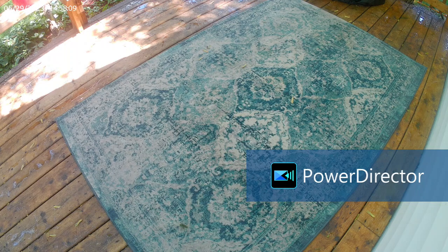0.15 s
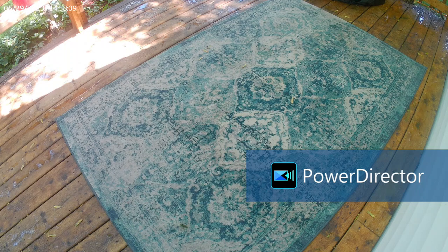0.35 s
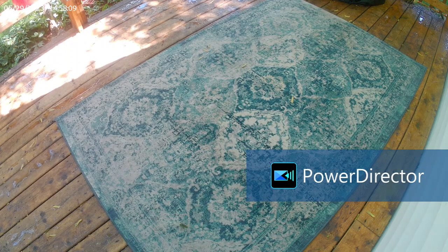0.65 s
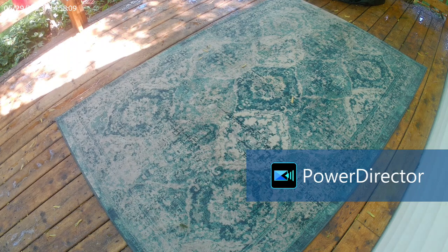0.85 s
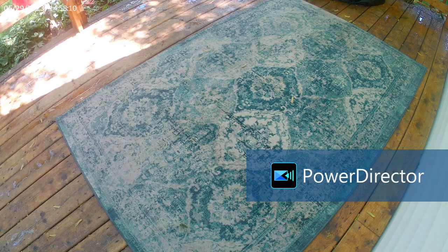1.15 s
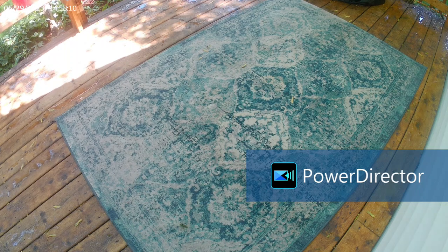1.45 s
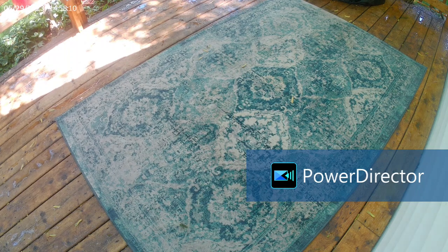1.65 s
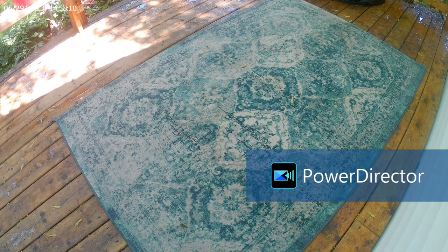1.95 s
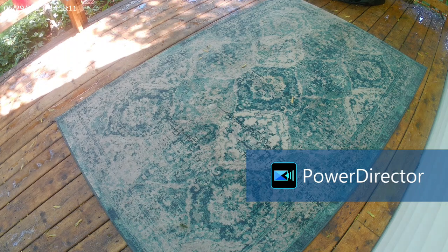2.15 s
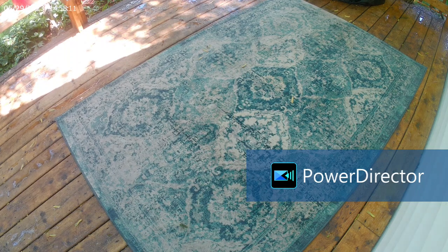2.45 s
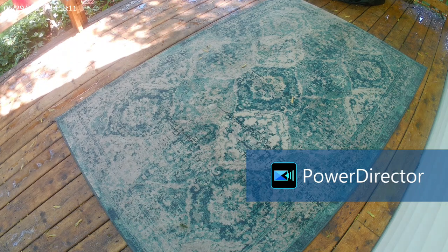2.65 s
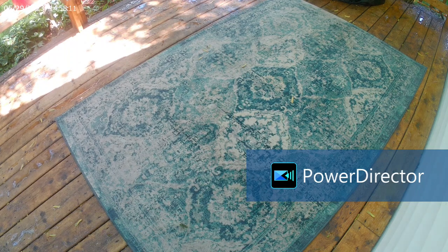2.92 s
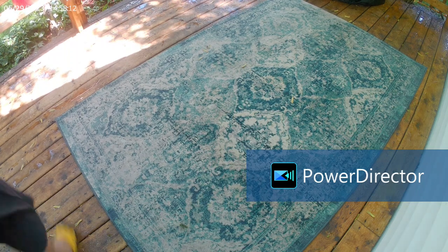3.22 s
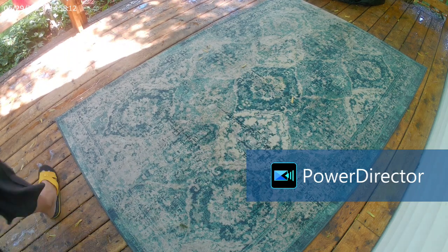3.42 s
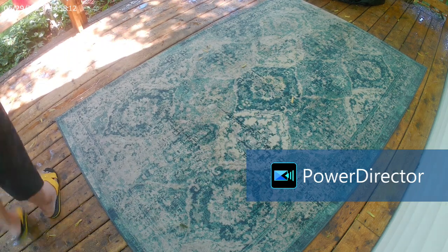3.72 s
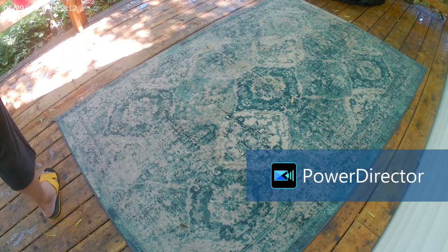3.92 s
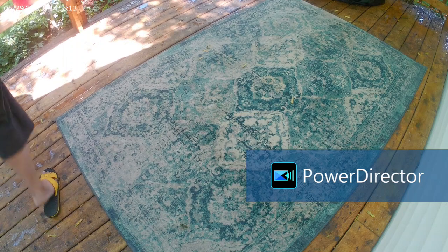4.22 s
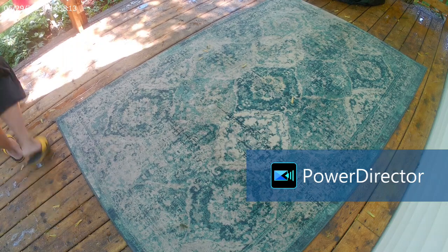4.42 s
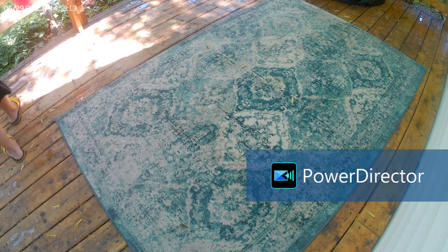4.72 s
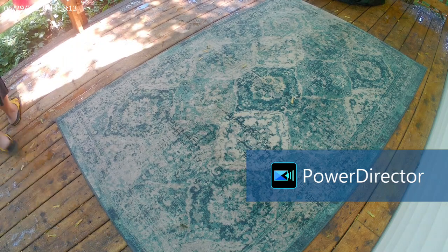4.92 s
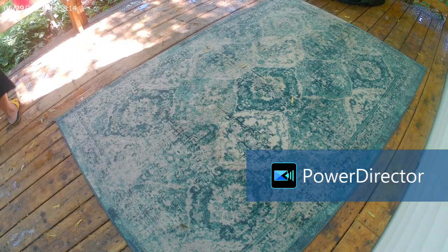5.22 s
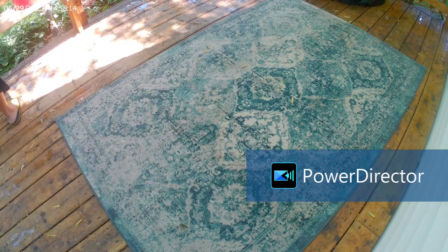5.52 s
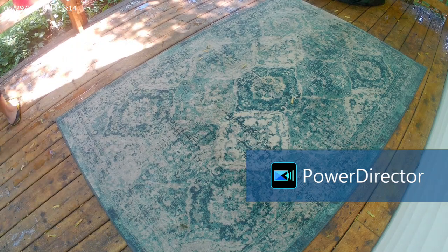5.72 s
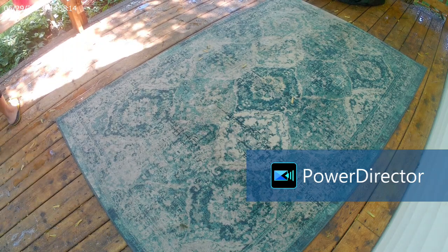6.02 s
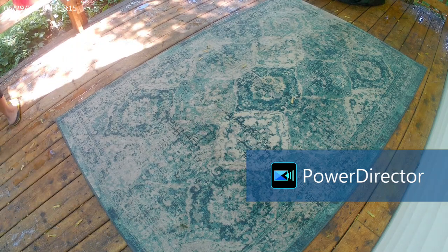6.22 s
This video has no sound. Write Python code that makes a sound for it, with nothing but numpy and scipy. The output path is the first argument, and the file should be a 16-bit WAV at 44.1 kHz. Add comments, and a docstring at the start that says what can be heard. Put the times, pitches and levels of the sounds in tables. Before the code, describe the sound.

A steady low outdoor rumble and faint hiss run throughout, with a single tiny, distant bird chirp at the start. Flip-flops come down on a wooden deck near the microphone, the first heavy steps shaking the frame. The rubber soles go on knocking, scuffing and snapping against the heels in an uneven rhythm, softer and a little farther off, until another deep thump and a few light clicks.

```python
"""Flip-flops on a wooden deck

Someone walks over the boards, close by at first and then a few steps away. Rubber soles knock on
the planks, snap back against the heels and scuff; heavy steps shake the joists. Under it lies a
bed of low outdoor rumble and faint hiss, with one thin bird chirp."""
import sys
import numpy as np
from scipy import signal
from scipy.fft import rfft, irfft
from scipy.io import wavfile
from scipy.ndimage import uniform_filter1d

SR = 44100
rng = np.random.default_rng(int(sys.argv[2]) if len(sys.argv) > 2 else 0)


def wav_out(sig):
    """Save sig, one row per channel (or a flat mono array), as 16-bit PCM at SR to the path in sys.argv[1]."""
    wavfile.write(sys.argv[1], SR, np.round(np.clip(np.atleast_2d(sig).T, -1, 1) * 32767).astype(np.int16))


N = 280652
HZ = np.fft.rfftfreq(8192, 1 / SR)  # frequency axis of the contact EQ curves

# tone of the outdoor rumble and hiss: f/Hz, relative level/dB
AIR_SPECTRUM = [(10, -5.5), (25, -1), (45, 0.5), (66, -4.5), (90, -13), (124, -15.5), (160, -24.5),
                (220, -26), (300, -31), (500, -35), (1000, -41), (3000, -49), (6000, -53.5), (15500, -57)]
# echo tail from the house wall and under the deck: f/Hz, t60/s
ECHO_DECAY = [(150, 0.31), (600, 0.13), (2500, 0.15), (10000, 0.064)]
# modes of the swaying joists: f/Hz, relative level/dB, t60/s
JOIST_MODES = [(14.1, -41, 1), (26.14, -1, 1), (41.4, 0, 0.28), (82.6, -1.5, 0.53), (99, 1.5, 0.14),
               (121.9, 2.5, 0.39), (144.5, 4.5, 0.21), (187, -2, 0.18)]
# ringing modes of the boards: f/Hz, width/Hz, relative level/dB
BOARD_MODES = [(306, 15, 13.5), (367, 9.5, 19), (422, 38, 16), (669, 28, 17), (1023, 52, 9), (1200, 35, 15),
               (1425, 19, -2), (1720, 30, -4), (1650, 25, 4), (2020, 25, 13), (2150, 25, 10), (2240, 60, 1),
               (2660, 19, 5), (4510, 150, 13), (7200, 120, 18)]
# colour of rubber on skin and wood: f/Hz, relative level/dB
RUBBER_COLOUR = [(100, 15.5), (2000, 5.5), (3300, 5.5), (5500, 1.5), (7500, 3.5), (10300, 6), (11500, -7),
                 (16000, -9)]
# body weight coming down on the joists: t/s, level/dB, contact time/s
WEIGHT_DROPS = [(.278, -39, 0.0018), (1.089, -37.5, 0.0018), (1.120, -23.5, 0.012), (1.508, -11.5, 0.016),
                (1.935, -37.5, .003), (2.526, -42, .0015), (2.714, -37.5, 0.00092), (2.937, -38, .001),
                (5.382, -26.5, 0.0058), (5.396, -32.5, 0.0056), (5.446, -24.5, .013)]
# soles sliding over the grain, and at 5.40 s a brief rattle of the deck: t/s, level/dB, high edge/Hz, decay/s
SOLE_SCUFFS = [(0, -59, 3800, 0.036), (0.504, -57.5, 2800, 0.032), (1.44, -55, 3000, .14),
               (2.275, -55.5, 4200, .1), (2.629, -51.5, 7700, 0.046), (2.905, -51, 5940, .04),
               (3.29, -54, 4200, .042), (3.402, -51.5, 4400, .023), (3.473, -52, 4000, .045),
               (3.579, -60, 8400, .03), (4.226, -47.5, 3460, .014), (4.557, -57.5, 7600, .022),
               (4.815, -46.5, 4430, 0.023), (5.127, -62, 10700, 0.046), (5.40, -50, 1040, 0.09)]
# soles landing on the boards, and at 5.38 s a long low boom of the deck: t/s, level/dB, plank pitch/Hz, decay/s
SOLE_KNOCKS = [(.274, -47, 200, 0.016), (1.084, -35, 340, 0.012), (1.12, -35.5, 334, 0.013),
               (1.475, -39.5, 700, 0.0074), (1.493, -36.5, 520, 0.011), (1.505, -26.5, 490, .013),
               (1.506, -30, 136, 0.021), (1.913, -30.5, 166, 0.023), (2.521, -37.5, 233.5, 0.015),
               (2.635, -46.5, 546, 0.046), (2.712, -42, 390, 0.023), (2.861, -38.5, 366, 0.015),
               (2.912, -39.5, 490, 0.023), (2.941, -37, 210, .026), (3.266, -47.5, 370, 0.023),
               (3.602, -35, 260, 0.0051), (4.114, -36, 560, 0.019), (4.734, -38, 680, 0.015),
               (5.224, -48.5, 770, .006), (5.37, -34.5, 497, 0.019), (5.385, -33, 355, 0.03),
               (5.38, -26, 95, .11), (5.451, -39.5, 660, 0.0062), (5.476, -39, 210, 0.017),
               (5.775, -35, 495, 0.011)]
# soles slapping: t/s, level/dB, low edge/Hz, high edge/Hz, air pocket pitch/Hz, decay/s
SOLE_SLAPS = [(1.1172, -26, 336, 3780, 710, 0.0081), (1.4993, -20.5, 404, 2260, 1450, .0095),
              (1.9146, -37, 480, 2420, 1020, 0.0069), (1.9333, -37, 550, 2350, 1750, 0.0073),
              (2.4171, -39.5, 710, 2660, 2500, 0.008), (2.863, -44.5, 580, 4200, 2180, 0.0073),
              (2.890, -41, 560, 3600, 990, 0.01), (2.9153, -31.5, 750, 5000, 4460, 0.0025),
              (2.94, -42.5, 640, 2400, 2930, 0.017), (3.5215, -44, 1100, 2000, 1680, 0.0085),
              (3.6027, -38, 2600, 2400, 3150, 0.0044), (4.2465, -40, 1700, 3400, 2300, 0.0041),
              (4.718, -51.5, 2000, 10000, 2300, 0.014), (5.3704, -37.5, 800, 930, 1450, 0.01),
              (5.63, -46, 1000, 4400, 2680, 0.0047), (5.7765, -47.5, 2600, 2000, 2620, 0.0055)]


def amp(db):
    """Decibels to gain."""
    return 10 ** (np.asarray(db) / 20)


def unit_rms(x):
    """Scales to an rms of one."""
    return x / np.sqrt(np.mean(x ** 2) + 1e-20)


def curve_at(points, hz):
    """Reads a breakpoint curve on a log-frequency axis."""
    f, value = np.transpose(points)
    return np.interp(np.log(hz + 1), np.log(f + 1), value)


def add(mix, start, sound):
    """Drops a sound into the mix at a start time in seconds."""
    part = mix[max(round(start * SR), 0):][:len(sound)]
    part += sound[:len(part)]


def resonance(hz, width, db):
    """Power gain of one resonant peak."""
    return amp(db) ** 2 / (1 + (2 * (HZ - hz) / width) ** 2)


def contact_eq(low_hz, high_hz, order):
    """Gain curve of a contact: its size sets the low edge, its softness the high edge."""
    low_cut = (1 + (low_hz / (HZ + 1)) ** 4) ** -.5
    high_cut = (1 + (HZ / high_hz) ** (2 * order)) ** -.5
    return low_cut * high_cut


def board_eq():
    """Gain curve of the boards: resonances standing out of a flat response."""
    return np.sqrt(1 + sum(resonance(*mode) for mode in BOARD_MODES))


def ring(drive, eq):
    """Plays a force through a minimum-phase body with this EQ curve, at unit power gain."""
    log_gain = np.log(np.maximum(eq / eq.max(), 1e-5))
    mirrored = np.concatenate([log_gain, log_gain[-2:0:-1]])
    response = np.exp(np.conj(signal.hilbert(mirrored)))
    taps = np.fft.ifft(response).real[:len(HZ)]
    return signal.fftconvolve(drive, taps / np.linalg.norm(taps))


def envelope(attack, decay):
    """Linear attack, then an exponential decay; both in seconds."""
    t = np.arange(SR // 2) / SR
    return np.minimum(t / attack, 1) * np.exp(-np.maximum(t - attack, 0) / decay)


def impact(attack, decay):
    """Many tiny contacts within one hit, which together drive all frequencies evenly."""
    shape = envelope(attack, decay)
    burst = shape * rng.standard_normal(len(shape))
    white = irfft(np.exp(1j * np.angle(rfft(burst))))
    local_power = abs(uniform_filter1d(white ** 2, size=200))
    return shape * white / np.sqrt(local_power + 1e-14)


def outdoor_air(level_db=-32.5, fade_db=0.5):
    """A steady bed of rumble and hiss, whose mids slowly ease off."""
    hz = np.fft.rfftfreq(N, 1 / SR)
    phases = np.exp(2j * np.pi * rng.random(len(hz)))
    bed = unit_rms(irfft(phases * amp(curve_at(AIR_SPECTRUM, hz)), N))
    mids = signal.sosfiltfilt(signal.butter(2, [300, 5000], "band", fs=SR, output="sos"), bed)
    fader = amp(np.linspace(fade_db, -fade_db, N))
    return amp(level_db) * (bed + mids * (fader - 1))


def bird_chirp(start=0.108, level_db=-56, glide_hz=(7200, 6700), glide_s=0.055, rasp=0.85, width_hz=1100):
    """One thin, raspy chirp far off, falling slightly."""
    out, shape = np.zeros(N), envelope(attack=0.005, decay=0.028)
    pitch = np.interp(np.arange(len(shape)) / SR, [0, glide_s], glide_hz)
    tone = np.sin(2 * np.pi * np.cumsum(pitch) / SR)
    lowpass = signal.butter(3, width_hz / 2, fs=SR, output="sos")
    flutter = unit_rms(signal.sosfilt(lowpass, rng.standard_normal(len(shape))))
    voice = unit_rms((1 - rasp + rasp * flutter) * tone)
    add(out, start, amp(level_db) * shape * voice)
    return out


def deck_echoes(send, predelay_s=0.0066):
    """A short diffuse tail off the house wall and under the deck, each band dying at its own speed."""
    hz, t, noise = signal.stft(rng.standard_normal(SR // 2), SR, nperseg=256)
    fade = 1000 ** (-t / curve_at(ECHO_DECAY, hz)[:, None])
    _, tail = signal.istft(noise * fade, SR, nperseg=256)
    out = np.zeros(N)
    add(out, predelay_s, signal.fftconvolve(send, tail / np.linalg.norm(tail)))
    return out


def joist_thumps():
    """Body weight sets the frame swaying with a smooth push; a shorter push reaches its higher modes."""
    out, t = np.zeros(N), np.arange(SR) / SR
    sway = sum(amp(db) * 1000 ** (-t / t60) * np.sin(2 * np.pi * hz * t) for hz, db, t60 in JOIST_MODES)
    for start, db, contact in WEIGHT_DROPS:
        push = np.sin(np.pi * np.minimum(t / contact, 1))
        add(out, start - contact / 2, -amp(db) * signal.fftconvolve(sway, push / push.sum()))
    return out


def sole_scuffs(clump_db=3.0):
    """Rubber catches and slips in clumps of tiny grains, swelling almost as slowly as it fades."""
    out, rubber = np.zeros(N), amp(curve_at(RUBBER_COLOUR, HZ))
    for start, db, high_hz, decay in SOLE_SCUFFS:
        shape = envelope(attack=0.85 * decay, decay=decay)
        grains, grip = rng.standard_normal((2, len(shape)))
        clumps = amp(clump_db * unit_rms(uniform_filter1d(grip, size=130)))
        contact = contact_eq(0.33 * high_hz, high_hz, order=2.03)
        add(out, start, amp(db) * ring(shape * unit_rms(grains * clumps), rubber * contact))
    return out


def sole_knocks(plank_q=11.0, ringing=0.28):
    """Foam lands softly: a dull knock at the pitch of the plank underfoot lightly rings the others."""
    out, boards = np.zeros(N), board_eq() ** ringing
    for start, db, plank_hz, decay in SOLE_KNOCKS:
        plank = np.sqrt(1.5 + resonance(plank_hz, plank_hz / plank_q, db=2.5))
        contact = contact_eq(0.63 * plank_hz, 1.26 * plank_hz, order=3.22)
        hit = impact(attack=0.24 * decay, decay=decay)
        add(out, start, amp(db) * ring(hit, plank * boards * contact))
    return out


def sole_slaps(order=2.45, pocket_q=24.0, hard_db=-25.5, hard_ringing=0.78, ringing_per_db=0.34,
               fizz_offset_db=-12, fizz_growth=1.316):
    """The sole snaps flat: a smack rings the trapped air and the boards, then the air fizzes out."""
    out, rubber = np.zeros(N), amp(curve_at(RUBBER_COLOUR, HZ))
    fizz_eq = rubber * contact_eq(low_hz=4800, high_hz=8000, order=order)
    for start, db, low_hz, high_hz, pocket_hz, decay in SOLE_SLAPS:
        attack = 0.43 * decay
        # a harder slap brings out more of the boards
        ringing = np.clip(hard_ringing + ringing_per_db * (db - hard_db), 0, 1)
        pocket = np.sqrt(2.5 + resonance(pocket_hz, pocket_hz / pocket_q, db=13.5))
        smack_eq = rubber * pocket * board_eq() ** ringing * contact_eq(low_hz, high_hz, order)
        add(out, start, amp(db) * ring(impact(attack, decay), smack_eq))
        # harder slaps squeeze the air out faster, so the fizz grows more than the smack
        fizz = ring(impact(attack, decay=0.014), fizz_eq)
        add(out, start, amp(fizz_offset_db + fizz_growth * db) * fizz)
    return out


def scene(slap_send_db=-14, step_send_db=-11):
    """Mono mix of the feet, their echoes, the deck frame and the outdoors."""
    slaps = sole_slaps()
    steps = sole_knocks() + sole_scuffs()
    echoes = deck_echoes(amp(slap_send_db) * slaps + amp(step_send_db) * steps)
    return (slaps + steps + echoes + joist_thumps() + bird_chirp() + outdoor_air())[None]


def record(dry, cutoff_hz=15900):
    """A steep high cut takes the very top off the mix."""
    lowpass = signal.firwin(511, cutoff_hz, window=("kaiser", 9), fs=SR)
    return signal.oaconvolve(dry, lowpass[None], "same")


dry = scene()
out = record(dry)
wav_out(out)
```